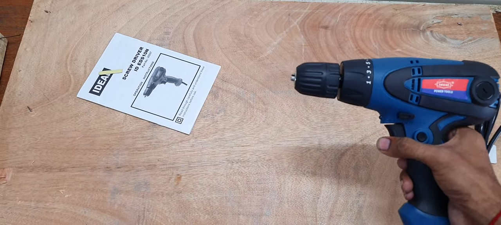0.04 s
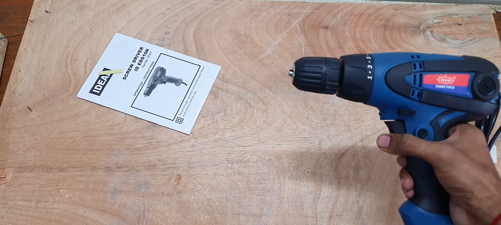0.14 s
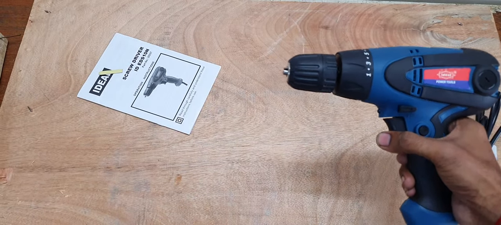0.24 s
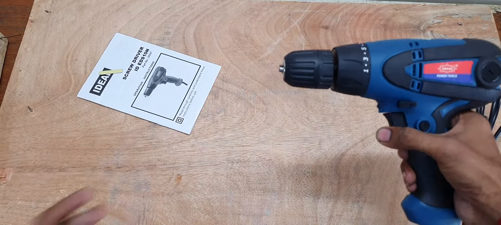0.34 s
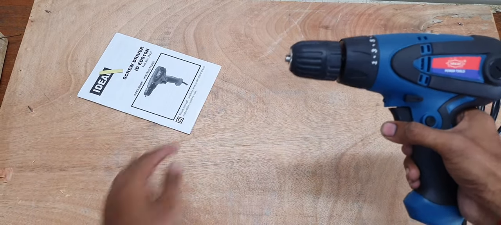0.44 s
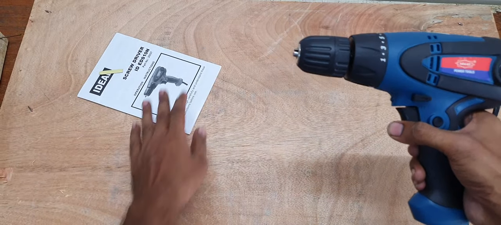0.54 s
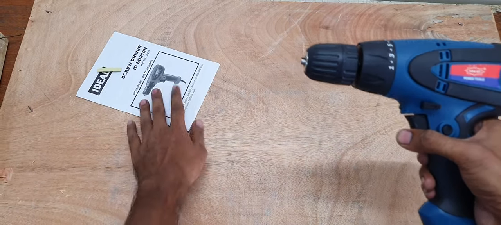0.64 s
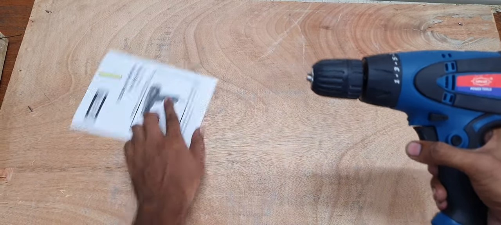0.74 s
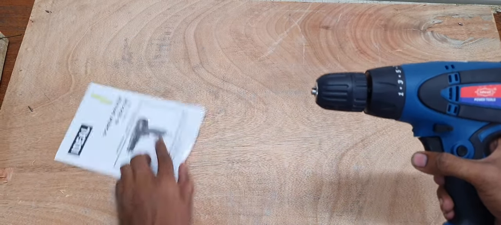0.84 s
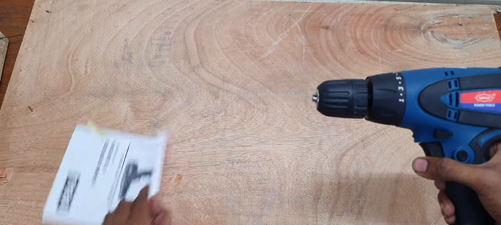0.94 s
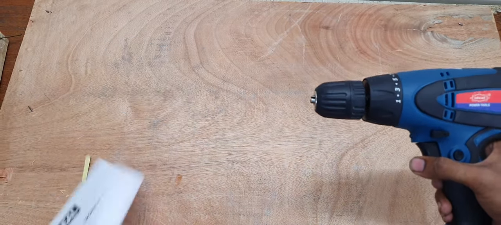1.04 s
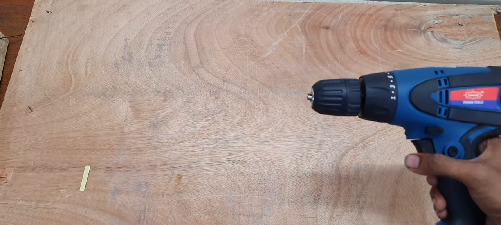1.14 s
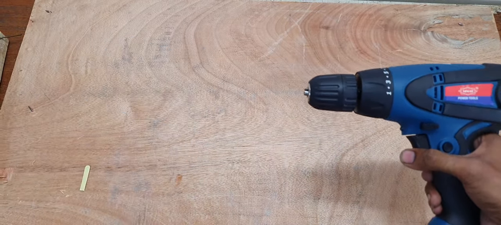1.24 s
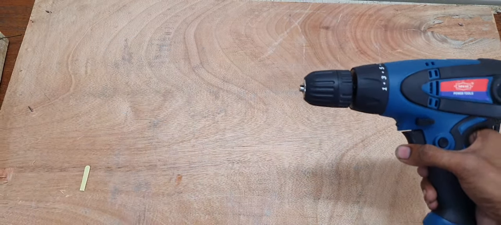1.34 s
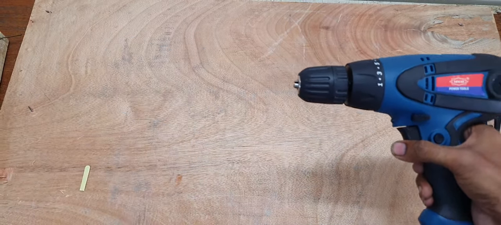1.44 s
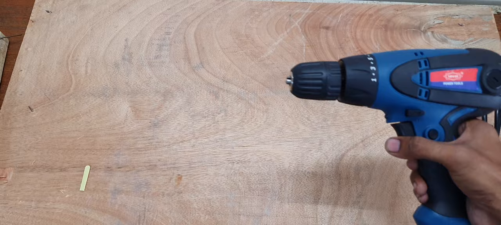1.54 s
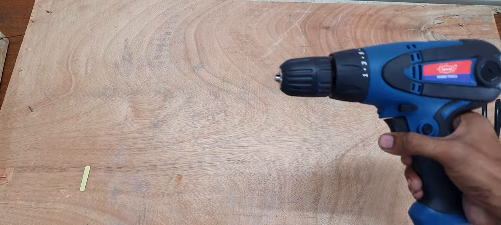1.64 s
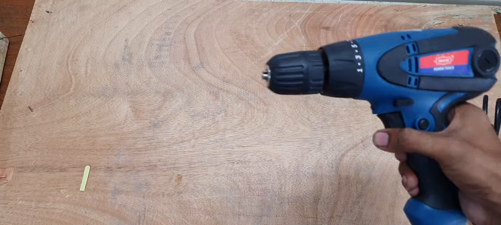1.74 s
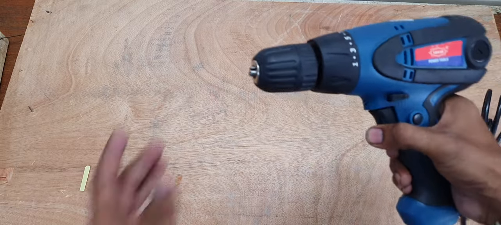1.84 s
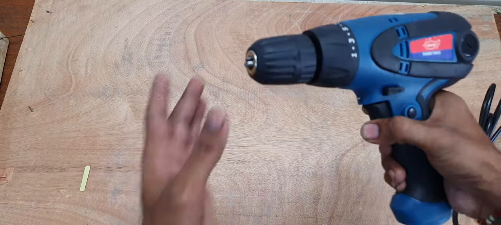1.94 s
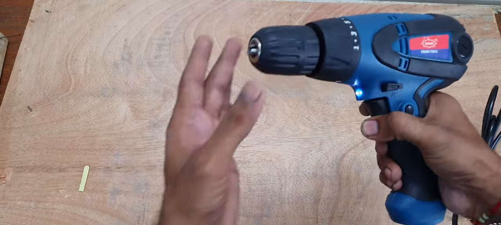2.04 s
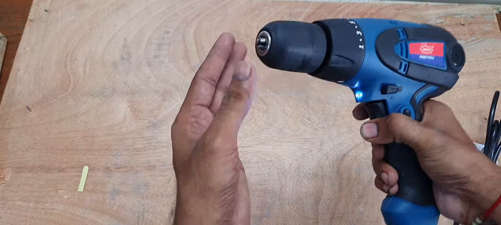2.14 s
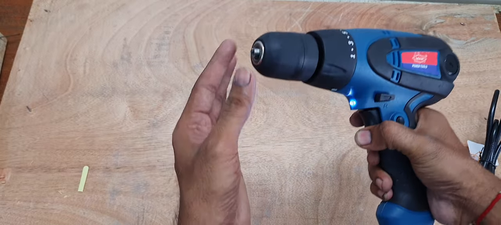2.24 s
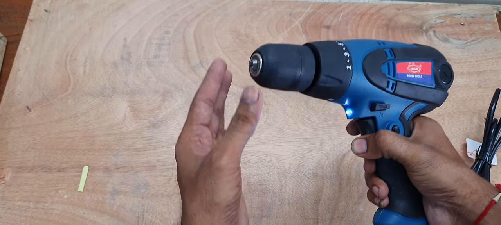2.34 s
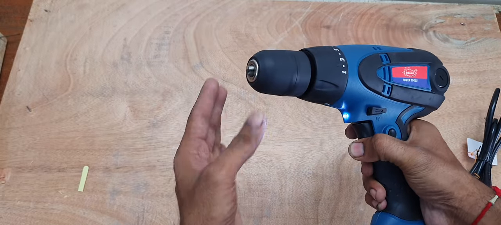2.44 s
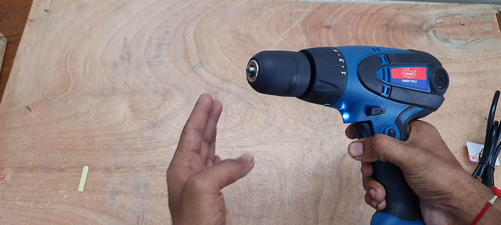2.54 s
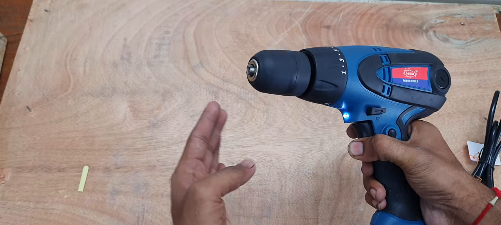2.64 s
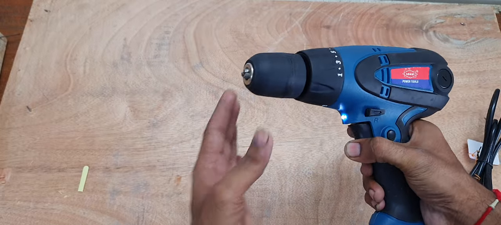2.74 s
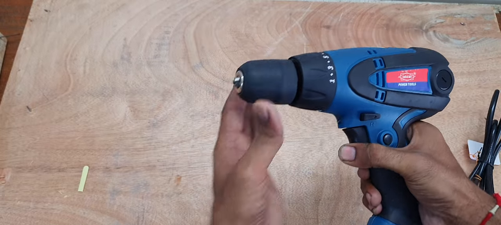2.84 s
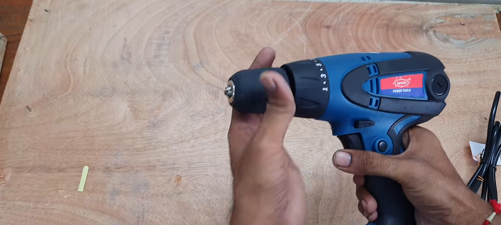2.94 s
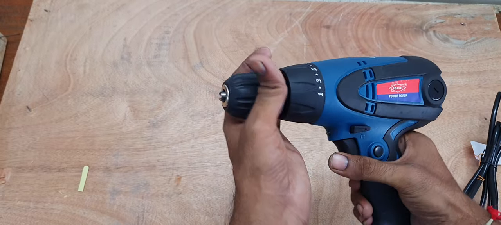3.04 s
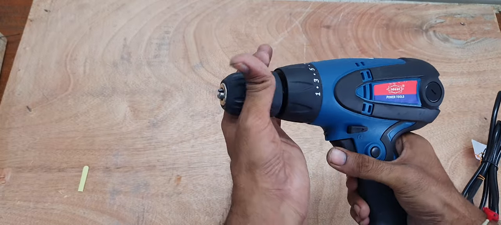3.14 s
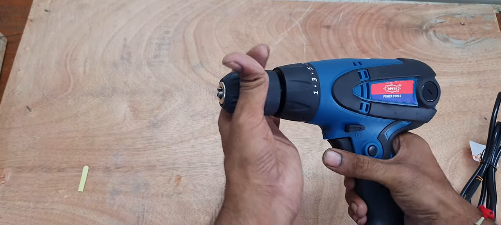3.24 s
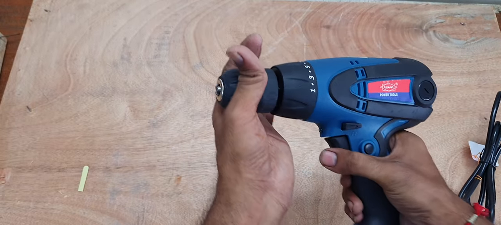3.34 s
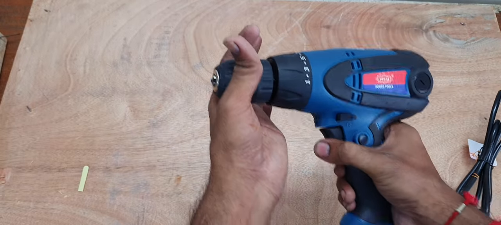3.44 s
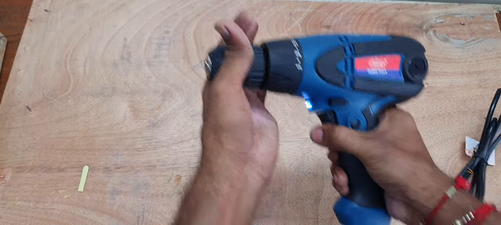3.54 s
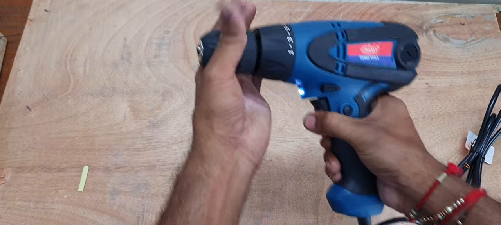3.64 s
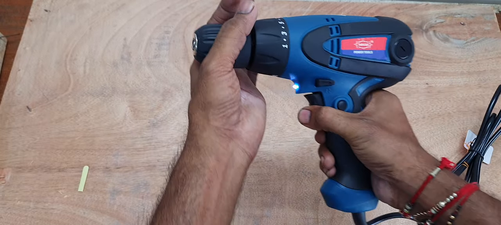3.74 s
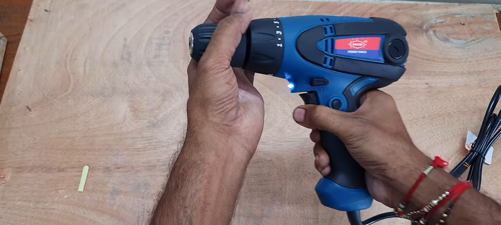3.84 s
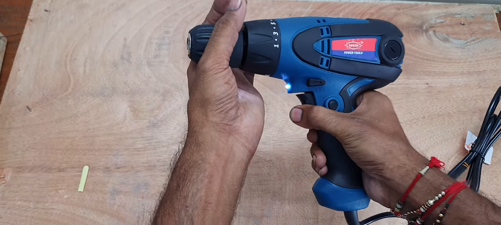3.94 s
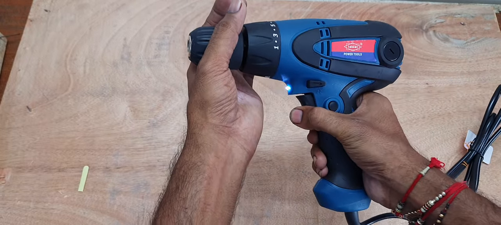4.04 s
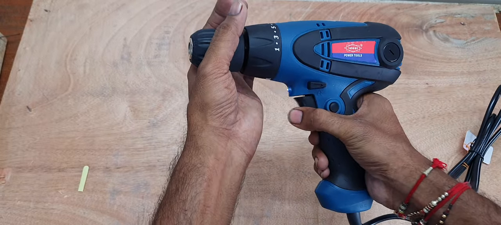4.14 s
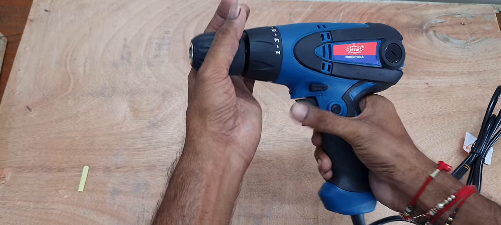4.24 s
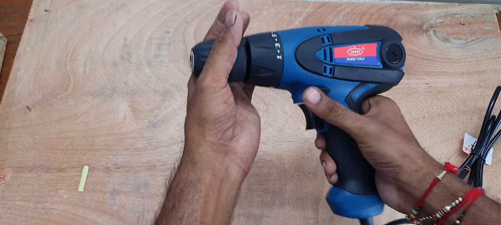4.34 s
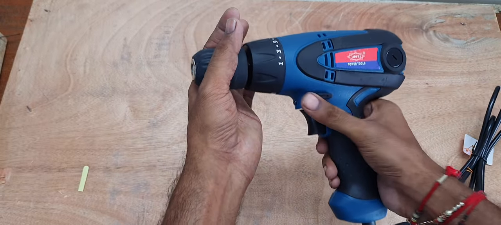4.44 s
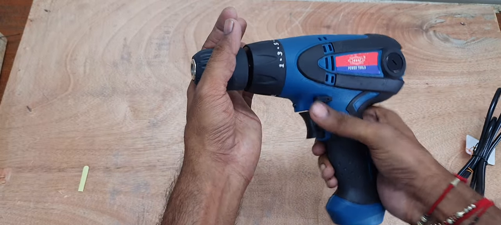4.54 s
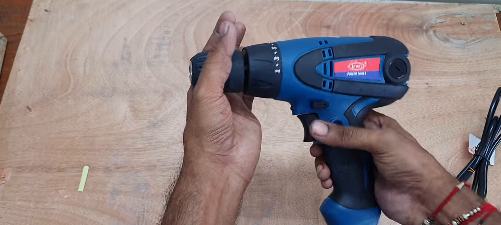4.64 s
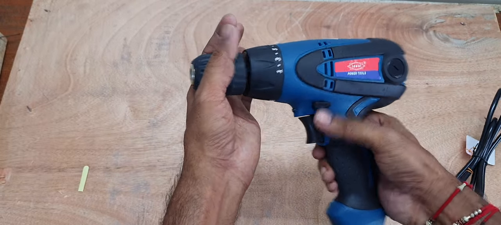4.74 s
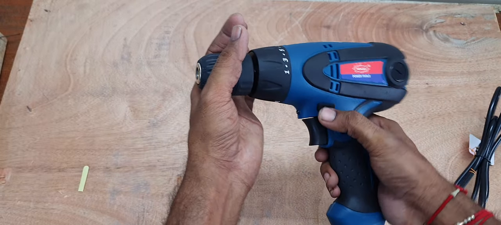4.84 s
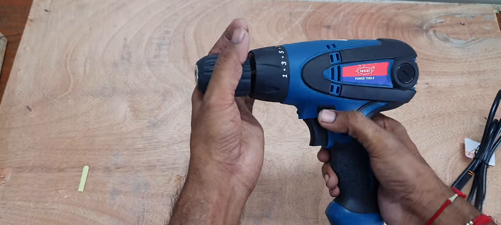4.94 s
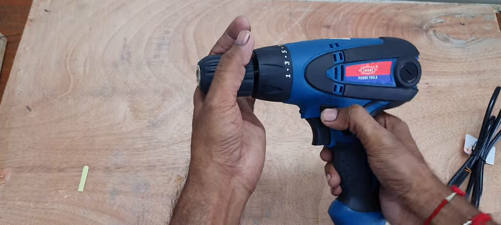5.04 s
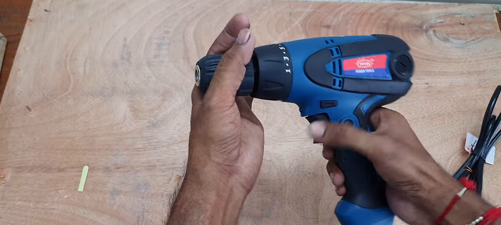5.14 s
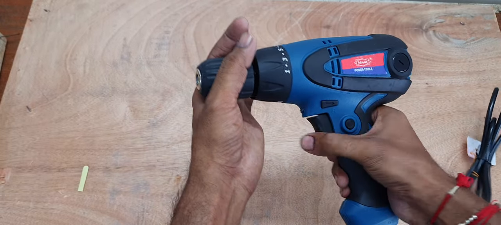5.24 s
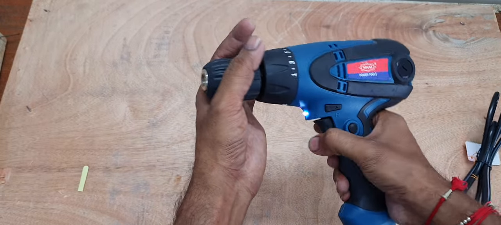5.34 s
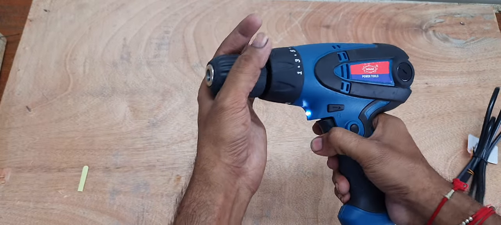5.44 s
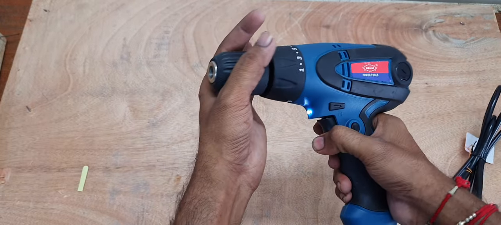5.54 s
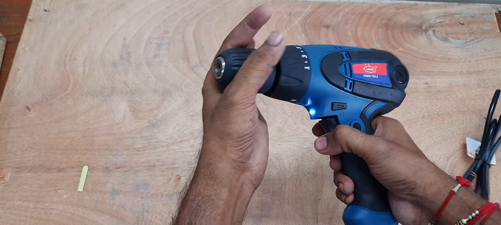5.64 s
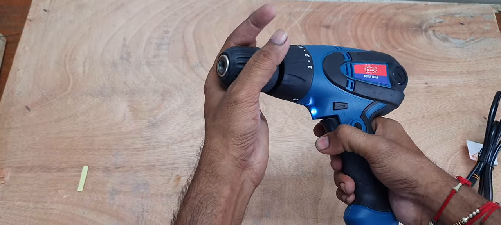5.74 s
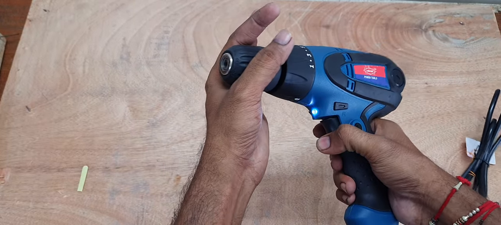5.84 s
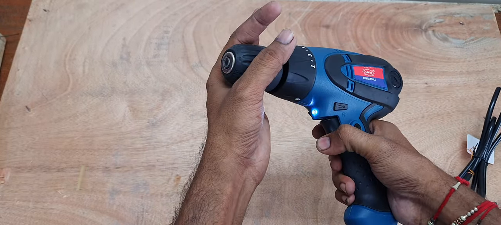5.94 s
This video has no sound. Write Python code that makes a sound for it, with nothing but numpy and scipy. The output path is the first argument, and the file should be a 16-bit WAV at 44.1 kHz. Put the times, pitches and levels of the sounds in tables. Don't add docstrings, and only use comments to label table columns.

```python
import sys
import numpy as np
from scipy import signal
from scipy.fft import rfft, irfft, next_fast_len
from scipy.io import wavfile
from scipy.ndimage import uniform_filter1d

SR = 44100
rng = np.random.default_rng(int(sys.argv[2]) if len(sys.argv) > 2 else 0)


def to_wav(s):
    ch = np.atleast_2d(s).T
    pcm = np.round(np.clip(ch, -1, 1) * 32767)
    wavfile.write(sys.argv[1], SR, pcm.astype(np.int16))


def boost(x):
    u = np.asarray(x, float) / 20
    return 10 ** u


N = 263277
NOW_S = np.arange(N) / SR
SIZE = next_fast_len(N, True)
HZ = np.maximum(np.arange(SIZE // 2 + 1) * SR / SIZE, 1)

# squeeze_s, let_go_s, free_running_tooth_hz, spin_up_s
PULLS = [
    (2.004, 2.834, 2247, .213),
    (3.537, 4.228, 1799, .158),
    (5.318, 6.5, 3281, .182),
]
# time_s, level_db
LOUDNESS = [
    [(2.1, -60), (2.13, -41), (2.17, -28), (2.21, -24.5), (2.9, -29), (3.3, -32), (3.53, -36), (3.69, -30),
     (4.12, -26), (4.52, -29), (4.88, -34.5), (4.98, -48), (5.0, -56)],
    [(5.35, -72), (5.418, -32), (5.55, -25), (5.97, -24.5)],
]
# freq_hz, share_0_to_1
NEAR_LIKENESS = [(500, 0.25), (1500, 0.11), (3000, 0.091), (6000, 0.096), (9000, 0.23), (14000, 0.11)]
# freq_hz, left_minus_right_db
NEAR_BALANCE = [(60, 2.5), (180, 3.0), (550, 1.8), (1650, 1.9), (4970, 2.6), (15000, 2.7)]
PLANET, FAN, TEETH_PER_TURN = 1.577, 4.5, 8


def rms_one(x):
    return x / np.sqrt(np.mean(x ** 2) + 1e-20)


def at_hz(points):
    hz, value = np.transpose(points)
    return np.interp(np.log(HZ), np.log(hz), value)


def resonance_db(at, peaks):
    return sum(db / (1 + (2 * (at - hz) / width) ** 2) for hz, width, db in peaks)


def colour(x, gain):
    return irfft(rfft(x, SIZE) * gain, SIZE)[..., :N]


def drift(rate_hz):
    r = np.exp(-2 * np.pi * rate_hz / SR)
    return rms_one(signal.lfilter([1], [1, -2 * r, r * r], rng.standard_normal(N + 9000))[9000:])


def ring(clicks, hz, t60_s):
    r, w = boost(-60 / (t60_s * SR)), 2 * np.pi * hz / SR
    return signal.lfilter([0, np.sin(w)], [1, -2 * r * np.cos(w), r * r], clicks + 1e-18)


def two_ports(shared, own, likeness, balance, lag):
    alike = np.clip(at_hz(likeness), 0, 1)
    late = np.exp(-1j * np.pi * HZ / SR * lag * np.array([[1], [-1]]))
    both = colour(shared, np.sqrt(alike) * late) + colour(own, np.sqrt(1 - alike))
    return colour(both, boost(at_hz(balance) * [[.5], [-.5]]))


def loudness_db():
    rows = []
    for table in LOUDNESS:
        rows += [(table[0][0] - .01, -110), *table, (table[-1][0] + .02, -110)]
    return np.interp(NOW_S, *np.transpose(rows))


def ducking():
    recovery_s = 1
    r = np.exp(-1 / (recovery_s * SR))
    return signal.lfilter([1 - r], [1, -r], np.clip(loudness_db() / 15 + 3, 0, 1))


def background():
    # freq_hz, level_db_per_hz
    workshop = [(25, -38), (45, -1.5), (75, 4.5), (120, -3.5), (190, -19), (280, -13), (500, -14),
                (1000, -19.5), (2000, -25), (3200, -28), (7000, -36.5), (8200, -44.5), (13000, -41),
                (15500, -41)]
    # freq_hz, width_hz, lift_db
    drones = [(72, 90, -1.5), (282.3, 20.5, 16.5), (405, 20, 11.5), (485, 15, 15), (567, 35, 7.5)]
    # freq_hz, share_0_to_1
    far_likeness = [(60, 0.92), (200, 0.99), (600, 0.53), (1600, 0.057), (5000, 0.079)]
    # freq_hz, left_minus_right_db
    far_balance = [(60, 2), (180, 3.9), (550, 2), (1650, 2.2), (4970, 1.5), (15000, -0.69)]
    level_db, ducking_db = -36, 2
    white = rng.standard_normal((3, N)) * boost(0.81 * drift(6))
    pair = two_ports(white[0], white[1:], far_likeness, far_balance, lag=0.3)
    shape = boost(at_hz(workshop) + 0.45 * resonance_db(HZ, drones))
    return boost(level_db - ducking_db * ducking()) * rms_one(colour(pair, shape))


def knocks():
    # start_s, peak_db, brightness_db
    blows = [(0.182, -4, -18), (0.202, -8, -14.5), (0.226, -14, -21), (0.263, -12, -12.5),
             (0.277, -12, -2.5), (0.306, -12.5, -20), (0.317, -16.5, -25), (0.33, -22, -19),
             (0.375, -18.5, -21), (0.396, -24, -11), (0.4255, -10, -17.5), (0.445, -23, 9),
             (0.472, -21.5, -28), (0.496, -19, -12), (0.514, -35, -16)]
    # freq_hz, level_db, t60_s
    table_top = [(113, -9.5, 0.15), (274.7, -4, 0.12), (334, -5, 0.11), (398, -5, 0.11), (481, -9, 0.12),
                 (546, -4, 0.071), (705, -9.5, 0.031), (916, -5, 0.03), (1118, -0.5, 0.031),
                 (1394, -6, 0.025), (1730, -11, 0.026), (2100, -17, 0.022), (2520, -21, .015)]
    out, t = np.zeros(N), np.arange(600) / SR
    for start_s, peak_db, bright_db in blows:
        blow = np.zeros(6000)
        blow[:600] = .16 * rng.standard_normal(600) * np.exp(-t / .006)
        blow[0] = 1
        sound = 0
        for k, (hz, level_db, t60_s) in enumerate(table_top):
            mode_db = level_db + rng.normal(0, 2.5) + (bright_db + 9.5) * (hz > 800)
            sound = sound + boost(mode_db) * (-1) ** k * ring(blow, hz, t60_s)
        out[round(start_s * SR):][:6000] += boost(peak_db - 2.5) * sound / abs(sound).max()
    return out


def room(x, t60_s):
    tail = rng.standard_normal((2, N)) * boost(-60 * np.minimum(NOW_S / t60_s, 3)) * (NOW_S > .004)
    tail /= np.sqrt(np.sum(tail ** 2, axis=1, keepdims=True))
    return irfft(rfft(x, 2 * SIZE) * rfft(tail, 2 * SIZE))[:, :N]


def rubbing():
    # loudest_s, swell_s, fade_s, level_db, low_part_rel_db
    strokes = [(.186, 0.0079, 0.056, -40, 13), (.264, 0.0044, 0.041, -39.5, 7.5),
               (.412, 0.068, 0.026, -46.5, 9), (.435, 0.0039, .05, -51, 21), (.525, 0.049, .015, -56, 17.5),
               (.762, 0.018, .08, -41, -14), (.815, 0.022, 0.035, -38.5, -16),
               (.862, 0.031, 0.015, -39, -31), (.994, 0.14, 0.031, -33.5, -4.5),
               (1.19, 0.036, 0.021, -39.5, -1), (1.79, 0.012, .2, -53, 7), (1.87, 0.058, 0.025, -52, -1.5),
               (1.945, 0.017, 0.045, -55, 1)]
    # freq_hz, level_db_per_hz
    paper_spectrum = [(700, 18.5), (1100, 7), (2100, 2), (3000, -3), (4400, -9.5), (7000, -10.5),
                      (8200, -19.5), (13000, -18.5), (15500, -17.5)]
    high_gain, low_gain = 0, 0
    for loudest_s, swell_s, fade_s, db, low_db in strokes:
        after_s = NOW_S - loudest_s
        stroke = boost(db) * np.exp(-np.where(after_s < 0, -after_s / swell_s, after_s / fade_s))
        high_gain = high_gain + stroke
        low_gain = low_gain + boost(low_db) * stroke
    grains = rng.standard_normal((3, N)) * boost(1.9 * drift(720) + 1.5 * drift(40))
    pair = two_ports(grains[0], grains[1:], NEAR_LIKENESS, NEAR_BALANCE, lag=3.2)
    low = 1 / (1 + (HZ / 3500) ** 6)
    paper = boost(at_hz(paper_spectrum)) / (1 + (700 / HZ) ** 4)
    high_part = high_gain * rms_one(colour(pair, paper * (1 - low)))
    return high_part + low_gain * rms_one(colour(pair, paper * low))


def ticks():
    # start_s, peak_db, centre_hz, t60_s
    snaps = [(0.261, -24, 1500, 0.017), (0.8594, -29, 4520, 0.015), (0.9038, -25.5, 1940, 0.018),
             (0.9782, -15.5, 1840, 0.044), (0.9786, -24, 900, 0.033), (0.979, -28, 4400, .03),
             (1.171, -35, 7010, 0.015), (1.779, -33, 3780, 0.021), (1.8208, -34, 2060, 0.011),
             (1.8654, -41, 1730, 0.015), (5.3936, -28, 3850, 0.023)]
    # start_s, peak_db, centre_hz, t60_s
    creaks = [
        (5.1876, -47, 12800, 0.02),
        (5.3717, -39, 12700, 0.018),
    ]
    out, t = np.zeros(N), np.arange(3000) / SR
    for start_s, peak_db, hz, t60_s in [*snaps, *creaks]:
        snap = rng.standard_normal(3000) * boost(-60 * t / t60_s)
        snap = 0.094 * snap + ring(snap, hz, 10.6 / hz)
        out[round(start_s * SR):][:3000] += boost(peak_db) * snap / abs(snap).max()
    return out


def squeal():
    # start_s, end_s, pitch_hz
    squeals = [
        (1.72, 2.12, 3340),
        (4.9, 5.38, 3455),
    ]
    squeal_levels = [-58.5, -49]
    out = 0
    waver_hz, flutter = 19.7 * drift(18), boost(2.8 * drift(30))
    companion = 0.065 * rms_one(ring(rng.standard_normal(N), 4700, .08))
    for (start_s, end_s, hz), db in zip(squeals, squeal_levels):
        tone = np.sin(2 * np.pi * np.cumsum(hz + waver_hz) / SR) + companion
        fade = np.clip(np.minimum(NOW_S - start_s, end_s - NOW_S) / .02, 0, 1)
        out = out + boost(db) * flutter * tone * fade
    return out


def speed():
    step_s, squeeze_s, let_go_s = .002, .152, .118
    friction_hz_per_s, drag_per_s = 1624, .603
    now, rate, rates = np.arange(0, N / SR + step_s, step_s), 0, []
    press, release, top_hz, lag_s = np.transpose(PULLS)[:, :, None]
    trigger = np.clip(np.minimum((now - press) / squeeze_s, (release - now) / let_go_s), 0, 1)
    drive, hold = (trigger * top_hz / lag_s).sum(0), (trigger / lag_s).sum(0)
    for push, held, free in zip(drive, hold, 1 - trigger.sum(0)):
        braking = free * (friction_hz_per_s + drag_per_s * rate)
        rate = max(0, rate + step_s * (push - held * rate - braking))
        rates.append(rate)
    return np.interp(NOW_S, now, rates)


def with_speed(tooth_hz, db, knee_hz, steepness):
    return db - 10 * np.log10(1 + (knee_hz / (tooth_hz + 60)) ** steepness)


def tooth_contacts(teeth, tooth_hz, ripple):
    contact = np.exp(1.2 / (1 + (tooth_hz / 450) ** 2) * np.cos(teeth))
    wobble = 1 + 0.086 * np.cos(teeth / TEETH_PER_TURN)
    gate = contact * wobble * (1 + 0.052 * ripple) * boost(0.89 * drift(1100) + 0.28 * drift(49))
    return rng.standard_normal((3, N)) * gate / np.sqrt(uniform_filter1d(gate ** 2, size=2000))


def shell_ringing(rattle, tooth_hz):
    # freq_hz, level_db, t60_s
    shell = [(925, -16, .04), (1240, -15, .03), (2050, -18, .03), (2500, -17, .03), (2900, -16, .04),
             (3210, -16, .025), (3850, -17, .03), (4310, -18, .03), (4900, -16, .025), (5170, -18, .03),
             (5750, -17, .025), (6250, -15, .02), (6800, -16, .02), (7100, -18, .02)]
    grip = {2050: (2.7, .3, 7), 3210: (2.25, .12, 5), 3850: (4.6, .3, 5), 5170: (3.95, .35, 6),
            6250: (3.3, .3, 4), 6800: (5.5, .15, 5)}
    out = boost(-3) * (tooth_hz / 3100) ** 4 * rms_one(ring(rattle, 1660, 0.0059))
    for hz, level_db, t60_s in shell:
        centre_s, half_s, freed_db = grip.get(hz, (0, 1, 0))
        level_db = level_db + freed_db * np.exp(-((NOW_S - centre_s) / half_s) ** 2)
        out += boost(level_db + 2 + 2 * drift(3)) * rms_one(ring(rattle, hz, t60_s))
    return out


def tooth_lines(teeth, tooth_hz, driven):
    # multiple_of_tooth_rate, driven_db, coasting_db
    lines = [(.5, -30, -30), (1, -26, -21), (1.5, -32, -22), (2, -19, -16), (2.5, -24, -18), (3, -17, -13),
             (3.5, -30, -19), (4, -21, -15), (4.5, -27, -18), (5, -22, -15), (5.5, -30, -20), (6, -26, -17),
             (7, -29, -18), (8, -31, -19), (9, -33, -21), (10, -35, -22)]
    # freq_hz, width_hz, lift_db
    line_peaks = [(2950, 450, 4), (3850, 500, 4), (5700, 1200, 2.5)]
    out = 0
    for multiple, driven_db, coasting_db in lines:
        level_db = coasting_db + driven * (driven_db - coasting_db) + 2.6 * drift(16)
        level_db += resonance_db(multiple * tooth_hz, line_peaks)
        level_db -= (1 - driven) * tooth_hz * (1 + multiple / 2) / 560
        line = np.sin(multiple * teeth + rng.uniform(0, 2 * np.pi))
        out = out + boost(level_db + 12.5 - 4 * driven) * line
    return out


def housing(force, tooth_hz, driven, pull):
    # freq_hz, level_db_per_hz
    housing_spectrum = [(500, -12), (700, -16), (930, -6), (1250, -7), (1650, -7.5), (2300, -4.5),
                        (3000, -4), (3800, -1), (5300, -3.5), (6400, 0.5), (7200, -2.5), (7900, -10),
                        (12000, -10), (15500, -15.5)]
    band_edges = [1700, 4700, 7600]
    pull_hiss = [0.5, 0, -1.5]
    coast_brush = [2.0, -1.0, 0]
    echo, echo_spacing_hz = 0.26, 900
    brushes_driven_db, brushes_coasting_db = 0.5, 1
    pair = two_ports(force[0], force[1:], NEAR_LIKENESS, NEAR_BALANCE, lag=1.92)
    body = boost(at_hz(housing_spectrum)) / (1 + (450 / HZ) ** 4)
    echo_band = 1 / (1 + (HZ / 7000) ** 4) / (1 + (2200 / HZ) ** 6)
    body = body * (1 - echo * np.exp(-2j * np.pi * HZ / echo_spacing_hz) * echo_band)
    below = [0] + [1 / (1 + (HZ / edge) ** 10) for edge in band_edges] + [1]
    air = with_speed(tooth_hz, db=-6, knee_hz=1490, steepness=2.8)
    brush_db = brushes_coasting_db + driven * (brushes_driven_db - brushes_coasting_db)
    brushes = with_speed(tooth_hz, brush_db, knee_hz=208, steepness=4.5)
    brushes += (1 - driven) * np.take(coast_brush, pull)
    hiss = with_speed(tooth_hz, db=0.62, knee_hz=540, steepness=3.6)
    hiss += uniform_filter1d(driven, size=20000) * np.take(pull_hiss, pull)
    gear_db, out = loudness_db(), 0
    for low, high, rel_db in zip(below, below[1:], (air, 0, brushes, hiss)):
        out = out + boost(gear_db + rel_db) * rms_one(colour(pair, body * (high - low)))
    return out


def whines(teeth, tooth_hz, driven, ripple, pull):
    pull_whine = [-32, -34.5, -28.5]
    # freq_hz, level_db
    whine_path = [(1500, -24.5), (2250, -11), (2600, -7), (2850, 2), (3350, -4.5), (3900, -13), (4400, -1),
                  (5000, -11)]
    planet_db = np.take(pull_whine, pull) + np.interp(PLANET * tooth_hz, *np.transpose(whine_path))
    planet = PLANET * teeth + .9 * drift(60)
    load = uniform_filter1d(driven, size=5000) ** 0.88 * (1 + 0.95 * ripple)
    whine = load * boost(planet_db + 7.5 + 2 * drift(47)) * (np.sin(planet) + 0.14 * np.sin(2 * planet))
    whine += boost(-33) * np.sin(FAN * teeth) * np.clip(tooth_hz / 300 - 8.3, 0, 1)
    whine += boost(-43) * (tooth_hz / 3100) ** 3 * np.sin(teeth / TEETH_PER_TURN)
    return whine * boost(loudness_db().clip(-110, -40) + 39.0) * boost([[1.2], [-1.2]])


def drill():
    mains_hz = 50.2
    tooth_hz = speed()
    pull = np.clip(np.searchsorted(np.transpose(PULLS)[0], NOW_S) - 1, 0, None)
    driven = uniform_filter1d((np.gradient(tooth_hz) > 0) * 1., size=1500)
    current = np.exp(1.5 * np.cos(2 * np.pi * mains_hz * NOW_S - .6)) / 1.65 - 1
    ripple = driven * current * np.where(NOW_S < 5.2, 1, .4)
    teeth = 2 * np.pi * np.cumsum(tooth_hz * (1 + .003 * drift(25) + .006 * ripple)) / SR
    force = tooth_contacts(teeth, tooth_hz, ripple)
    force[0] += shell_ringing(force[0], tooth_hz) + tooth_lines(teeth, tooth_hz, driven)
    return housing(force, tooth_hz, driven, pull) + whines(teeth, tooth_hz, driven, ripple, pull)


def take_up():
    # start_s, peak_db
    play = [
        (2.0932, -36),
        (2.1045, -37),
        (2.1142, -24),
        (2.12, -26),
        (2.126, -28),
        (2.132, -25),
        (2.139, -25),
        (2.143, -26),
        (2.153, -22),
    ]
    out, t = np.zeros(N), np.arange(500) / SR
    for start_s, peak_db in play:
        snap = rng.standard_normal(500) * boost(-60 * t / .014)
        out[round(start_s * SR):][:500] += boost(peak_db - 3) * snap / np.std(snap[:60])
    band = 1 / (1 + (HZ / 12500) ** 8) / (1 + (1500 / HZ) ** 4)
    return colour(out, band) * boost([[1], [-1]])


def scene():
    blows = knocks() * boost([[1.8], [-1.8]]) + ticks() * boost([[1.1], [-1.1]])
    far = squeal()
    tail = boost(-9.5) * room(blows.mean(0) + 3.0 * far, t60_s=0.39)
    return background() + blows + rubbing() + tail + 0.53 * far + drill() + take_up()


def low_pass(x):
    return signal.sosfilt(signal.butter(12, 17070, fs=SR, output="sos"), x)


def record(dry):
    cutoff_hz = 15950
    mix = colour(dry, 1 / (1 + (HZ / cutoff_hz) ** 400))
    return low_pass(mix)


dry = scene()
out = record(dry)
to_wav(out)
```